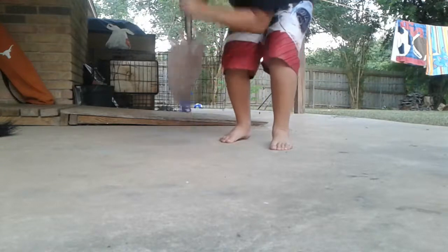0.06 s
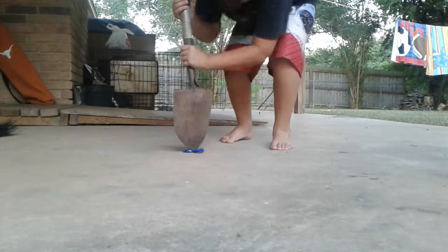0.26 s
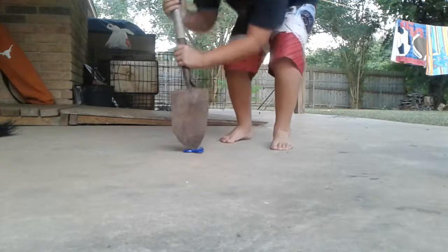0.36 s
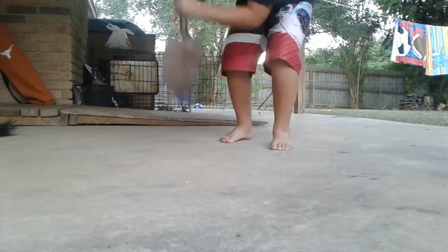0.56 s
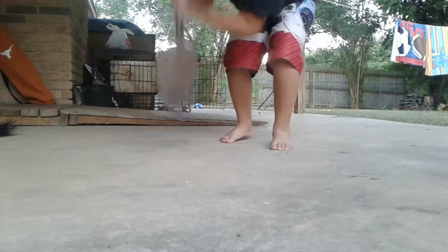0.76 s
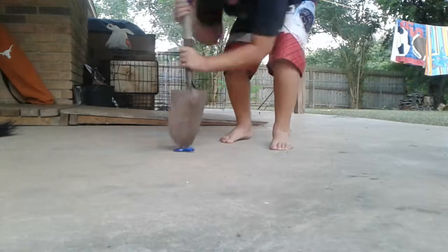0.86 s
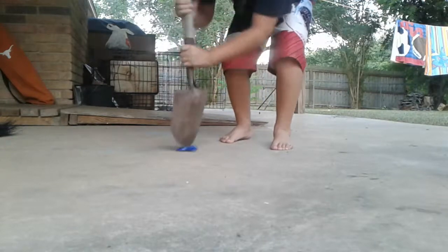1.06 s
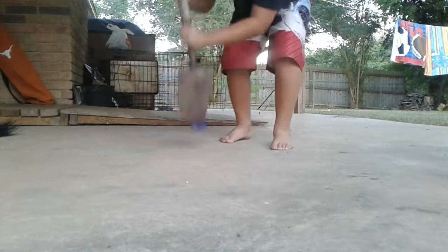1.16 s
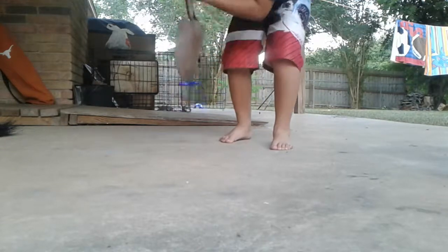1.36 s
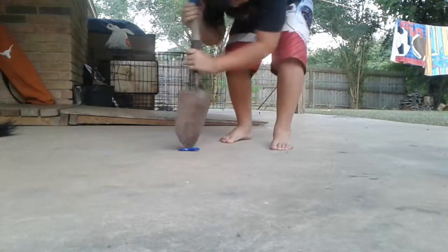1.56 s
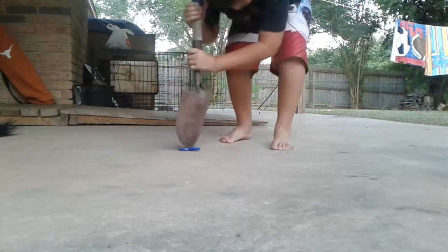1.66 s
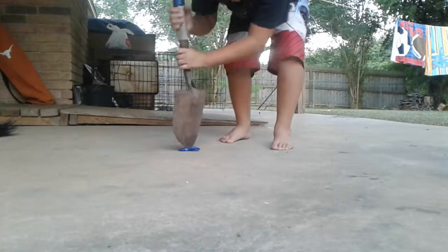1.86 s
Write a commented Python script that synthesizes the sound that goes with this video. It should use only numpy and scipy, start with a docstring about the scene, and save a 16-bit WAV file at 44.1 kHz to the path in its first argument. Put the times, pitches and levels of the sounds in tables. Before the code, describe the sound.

A metal shovel slams edge first onto a small plastic toy on concrete, close to a low microphone. After a faint clothing rustle, sharp cracks land at about 0.2, 0.9 and 1.6 seconds, the first loudest with the strongest hollow knock. Each has a quick bouncing second contact, gritty clatter, and a short clang and low porch boom fading within half a second. Quiet garden air, thin insect hiss and faint hum remain.

```python
"""Three hard cracks, each with a hollow knock, a brief clang and a short low boom, in quiet garden air.
A steel shovel is driven edge first onto a small plastic toy on a concrete patio: shaped noise makes
the crack, dense clang and grit; decaying sines make the toy, blade, slab and porch.
Clothes rustle as the first blow is swung. Behind lie noise-made air and thin insect hiss, and a faint
hum of two sines."""
import sys
import numpy as np
from scipy import signal
from scipy.fft import rfft, irfft, next_fast_len
from scipy.io import wavfile
from scipy.ndimage import map_coordinates

SR = 44100
rng = np.random.default_rng(int(sys.argv[2]) if len(sys.argv) > 2 else 0)


def waveform_to_disk(signal):
    """Save audio, clipped to [-1, 1], as 16-bit WAV at the path in sys.argv[1]."""
    frames = np.transpose(np.atleast_2d(signal))
    scaled = np.clip(frames, -1, 1) * 32767
    samples = np.round(scaled).astype(np.int16)
    wavfile.write(sys.argv[1], SR, samples)


N = 83790

# spectrum of the close, short-lived modes of blade and toy, also of the noise tail: f/Hz, density/dB
CLANG_SPECTRUM = [(30, -40), (70, -32.5), (130, -10.5), (175, -5), (290, -9), (400, -9.5), (600, -6.5),
                  (1000, -1.5), (1300, 0), (1500, -3), (1950, -0.5), (2400, -9), (2900, -1.5), (3300, -9),
                  (4500, -8), (6300, -13.5), (8700, -8), (9900, -10), (11500, -28), (13500, -20.5),
                  (15500, -23.5)]


def amp(db):
    """Decibels to gain."""
    return 10 ** (np.asarray(db) / 20)


def unit(x):
    """Scale to rms 1."""
    return x / np.sqrt(np.mean(x ** 2) + 1e-20)


def clock():
    """Seconds at every sample."""
    return np.arange(N) / SR


def along(points, hz):
    """(f/Hz, value) points interpolated on a log-frequency axis."""
    point_hz, value = np.transpose(points)
    return np.interp(np.log(hz + 1), np.log(point_hz + 1), value)


def level(points):
    """(t/s, level/dB) points as a gain at every sample."""
    return amp(np.interp(clock(), *np.transpose(points)))


def fade(t, t60_s):
    """Exponential decay, -60 dB at t60_s."""
    return np.exp(-np.log(1000) * t / t60_s)


def rise(tau_s):
    """Exponential onset with time constant tau_s."""
    return 1 - np.exp(-clock() / tau_s)


def delayed(x, delay_s):
    """x starting later."""
    return np.pad(x, (max(round(delay_s * SR), 0), 0))[:N]


def wobble(knots_per_s):
    """Smooth random curve through normally distributed knots."""
    return map_coordinates(rng.standard_normal(1024), [clock() * knots_per_s], mode="mirror")


def noise(spectrum):
    """Coloured noise of rms 1 from (f/Hz, density/dB) points."""
    gain = amp(along(spectrum, np.fft.rfftfreq(N, 1 / SR)))
    return unit(irfft(rfft(rng.standard_normal(N)) * gain, N))


def coloured(x, points):
    """Causal minimum-phase filter with the gain of (f/Hz, gain/dB) points, via the folded cepstrum."""
    m = 2 * next_fast_len(N)
    gain = amp(along(points, np.fft.rfftfreq(m, 1 / SR)))
    cepstrum = irfft(np.log(gain))
    cepstrum[1:m // 2] *= 2
    cepstrum[m // 2 + 1:] = 0
    response = np.exp(rfft(cepstrum))
    return irfft(rfft(x, m) * response)[:N]


def high_passed(x, cutoff_hz):
    """Second-order bass cut."""
    return signal.sosfilt(signal.butter(2, cutoff_hz, "high", fs=SR, output="sos"), x)


def ring(modes, rise_cycles, scatter_db, rough):
    """Damped modes (f/Hz, level/dB, t60/s) with random level and phase; reflections make them flutter."""
    rough_knots_per_s = 60
    t, out = clock()[:N // 3], np.zeros(N)
    for hz, db, t60_s in modes:
        knots = rng.standard_normal((2, 256))
        real, imag = (np.interp(t * rough_knots_per_s, np.arange(len(k)), k) for k in knots)
        flutter = 1 + rough * (real + 1j * imag)
        tone = np.real(flutter * np.exp(2j * np.pi * (hz * t + rng.random())))
        gain = amp(db + scatter_db * rng.standard_normal())
        out[:len(t)] += gain * rise(rise_cycles / hz)[:len(t)] * fade(t, t60_s) * tone
    return out


def garden():
    """Air and narrow high insect hiss as shaped noise; hum as two sines of wavering phase."""
    # air and hiss spectra: f/Hz, density/dB
    air_spectrum = [(25, -15), (60, -4.5), (110, -2.5), (210, -6), (400, -11), (1000, -15.5), (2500, -24.5),
                    (5000, -31), (8000, -36.5), (11000, -49)]
    hiss_spectrum = [(7500, -36), (8700, -16), (9300, -5), (9750, 3.5), (10300, -6.5), (11000, -31.5),
                     (13000, -31), (15500, -24)]
    # air and hiss levels: t/s, level/dB
    air_level = [(0, -52), (.25, -60.5), (.7, -59.5), (1.3, -63), (1.9, -62.5)]
    hiss_level = [(0, -54.5), (.18, -61), (.4, -62.5), (1.3, -66.5), (1.9, -66.5)]
    # hum partials: f/Hz, rms level/dB
    hum_partials = [(119, -72.5), (239, -71)]
    waver_rad = 0.26
    hum = np.zeros(N)
    for hz, db in hum_partials:
        phase = 2 * np.pi * hz * clock() + waver_rad * wobble(18)
        hum += amp(db) * np.sqrt(2) * np.sin(phase)
    return level(air_level) * noise(air_spectrum) + hum + level(hiss_level) * noise(hiss_spectrum)


def rustle():
    """Clothes and arms moving through the first downswing: noise under a level curve."""
    # cloth spectrum: f/Hz, density/dB
    cloth_spectrum = [(100, -1), (500, 2.5), (1300, -8), (2700, -2), (4000, -15.5), (7000, -15.5),
                      (11000, -24), (15000, -22.5)]
    # cloth level: t/s, level/dB
    cloth_level = [(0, -76), (.05, -63.5), (.13, -51.5), (.17, -61), (.21, -78), (.3, -110)]
    return level(cloth_level) * noise(cloth_spectrum)


def porch():
    """Decaying low modes of the porch, each at a slightly random level."""
    # porch modes: f/Hz, level/dB, t60/s
    boom_modes = [(90.7, -38, 0.29), (158.2, -35.5, 0.47), (180.18, -27, 0.15), (239, -35.5, 0.36),
                  (283, -30, 0.24)]
    return ring(boom_modes, rise_cycles=1.2, scatter_db=0.93, rough=0)


def tail():
    """Faint longer noise tail under each blow, dying away with the clang's spectrum."""
    tail_db, t60_s = -33, 0.5
    return amp(tail_db) * fade(clock(), t60_s) * noise(CLANG_SPECTRUM)


def blip(blow_s):
    """One faint low blip just before each crack: a cosine under a Gaussian envelope."""
    hz, blip_db, lead_s, width_s = 410, -25, .0012, 0.0004
    t = clock() - blow_s + lead_s
    return -amp(blip_db) * np.exp(-(t / width_s) ** 2) * np.cos(2 * np.pi * hz * t)


def thud():
    """The shovel's weight arriving on the slab: a short, dull decaying sine."""
    hz, thud_db, t60_s = 270, -20, .035
    t = clock()
    return amp(thud_db) * rise(.5 / hz) * fade(t, t60_s) * np.sin(2 * np.pi * hz * t)


def grit():
    """Sparse filtered ticks of sand and plastic grinding under the edge, dying away."""
    # grit filter: f/Hz, gain/dB
    grit_filter = [(300, -19), (1000, -5), (2800, 4.5), (5000, -10.5), (9000, -4), (11500, -12.5),
                   (15500, -16)]
    ticks_per_s, grit_db, t60_s = 290, -24, 0.077
    ticks = (rng.random(N) < ticks_per_s / SR) * rng.standard_normal(N)
    return amp(grit_db) * fade(clock(), t60_s) * unit(coloured(ticks, grit_filter))


def clang():
    """Dense ringing, held up briefly by the near walls, then dying band by band."""
    # clang decay: f/Hz, t60/s
    band_t60 = [(100, 0.24), (400, .26), (1000, 0.21), (3000, 0.23), (8000, 0.22), (15000, 0.18)]
    clang_db, rise_tau_s, hold_s = -15.5, 0.005, 0.0045
    hz, t, bands = signal.stft(noise(CLANG_SPECTRUM), SR, nperseg=256)
    decay = fade(np.maximum(t - hold_s, 0), along(band_t60, hz)[:, None])
    ringing = signal.istft(bands * decay, SR)[1][:N]
    chatter = amp(2.66 * wobble(220))  # the edge chatters on the toy: dB, knots/s
    return amp(clang_db) * chatter * rise(rise_tau_s) * ringing


def blade(place, overtone_count=36):
    """Blade modes weighted by where the edge lands, plus random faint overtones at each blow."""
    # blade modes: f/Hz, relative level/dB, t60/s, place along the edge that rings it best/0-1
    blade_modes = [(668, -6, .23, 0), (743, -4, .2, .5), (959, 3.5, .29, .42), (972, 1, .27, .1),
                   (1183, 0, .26, .15), (1254, 0, .26, .02), (1303, 0, .26, .85), (1756, -1, .23, .1),
                   (2003, 3, .21, .64), (2036, 0, .23, .75), (2681, -7, .2, .85), (2985, -4.5, .24, .33),
                   (3505, -5, .26, .36), (5071, -7, .2, .5), (6070, -8, .25, .85), (6764, -7.5, .24, .5),
                   (7898, -4, .2, .55), (8145, -6, .21, .6), (8515, -3, .16, .15), (8900, -3, .2, .87)]
    blade_db, off_place_loss_db = -22, 16  # full loss where a mode is struck at its node
    low_hz, high_hz, overtone_db, overtone_t60_s = 2200, 10000, -38, .22
    modes = []
    for hz, db, t60_s, best_place in blade_modes:
        loss_db = off_place_loss_db * np.sin(np.pi * (place - best_place)) ** 2
        modes.append((hz, blade_db + db - loss_db, t60_s))
    for u in rng.random(overtone_count):
        modes.append((low_hz + u * (high_hz - low_hz), overtone_db, overtone_t60_s))
    return ring(modes, rise_cycles=11, scatter_db=4, rough=.4)


def knock(hz, low_cut_hz=450):
    """The toy's shell gives way and rings for a few cycles; its deep bass is cut away."""
    shell_db, delay_s, t60_s = -1, .0011, 0.012
    upper_hz, upper_db = 1865, -6.5  # second, stiffer mode
    t = clock()
    modes = np.sin(2 * np.pi * hz * t) + amp(upper_db) * np.sin(2 * np.pi * upper_hz * t)
    shell = amp(shell_db) * fade(t, t60_s) * modes
    return delayed(high_passed(shell, low_cut_hz), delay_s)


def crack():
    """Hard contact of steel, plastic and concrete: a fast-rising, fast-dying noise burst."""
    # crack spectrum: f/Hz, density/dB
    crack_spectrum = [(60, -33), (300, -7), (1200, 6), (3000, -14.5), (8500, -3.5), (11500, -20.5),
                      (15500, -13)]
    crack_db, rise_tau_s, t60_s = -5.5, 0.00053, 0.018
    return amp(crack_db) * rise(rise_tau_s) * fade(clock(), t60_s) * noise(crack_spectrum)


def shovel():
    """Every blow cracks and knocks, clangs, hops and clangs again, and stirs the porch."""
    # blows: t/s, level/dB, place along the edge/0-1, knock f/Hz, relative knock level/dB,
    # relative clang at first contact/dB, hop until it lands again/s, relative clang at landing/dB,
    # then colour gains/dB: bass, middle, upper middle, presence, treble
    blow_table = [(0.2082, 0, 0.1, 1059, -0.5, 2, 0.018, -7, 2.5, 1, -1, 0, -1),
                  (0.878, -1, .5, 806, -8, -2, .0195, -3, -2, -1, 1.5, -1, 2),
                  (1.5706, -1.5, .83, 1236, -6, 0, .016, -14.5, -1, 2.5, 3, -0.5, -1)]
    # frequencies of the colour gains: f/Hz
    colour_hz = [250, 1250, 2000, 3800, 7500]
    out = np.zeros(N)
    for blow_s, db, place, knock_hz, knock_db, first_db, hop_s, landing_db, *colour_db in blow_table:
        contacts = amp(first_db) * clang() + amp(landing_db) * delayed(clang(), hop_s)
        clatter = crack() + thud() + grit() + contacts + porch() + tail()
        clatter = coloured(clatter, list(zip(colour_hz, colour_db)))
        impact = clatter + blade(place) + amp(knock_db) * knock(knock_hz)
        out += amp(db) * (blip(blow_s) + delayed(impact, blow_s))
    return out


def scene():
    """Everything at one microphone near the ground."""
    return (shovel() + rustle() + garden())[None]


def record(dry):
    """The recorder rounds off the highest peaks, thins the deep bass and cuts steeply at its band limit."""
    clip_top, low_cut_hz, top_hz = 1.0, 77, 15850
    rounded = dry / (1 + np.abs(dry / clip_top) ** 6) ** (1 / 6)
    thinned = high_passed(rounded, low_cut_hz)
    return signal.sosfilt(signal.butter(24, top_hz, fs=SR, output="sos"), thinned)


dry = scene()
out = record(dry)
waveform_to_disk(out)
```